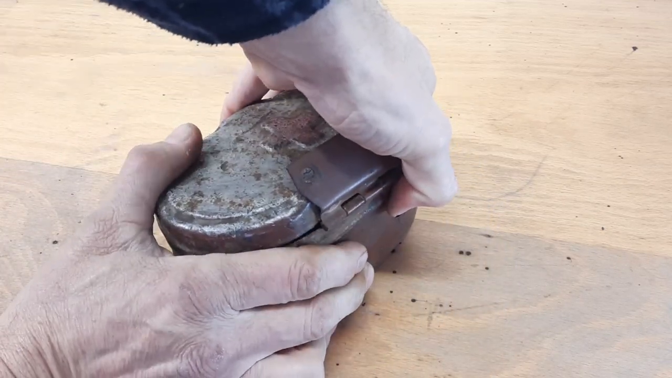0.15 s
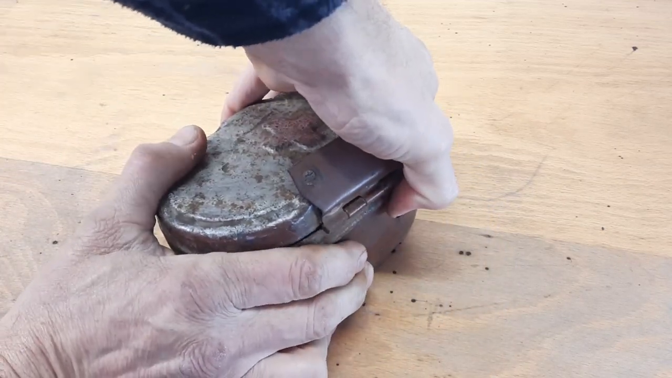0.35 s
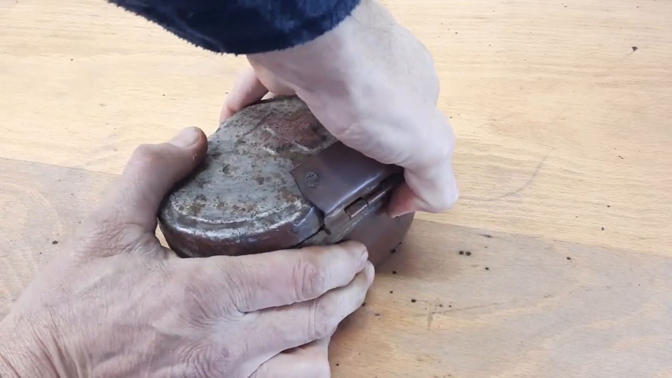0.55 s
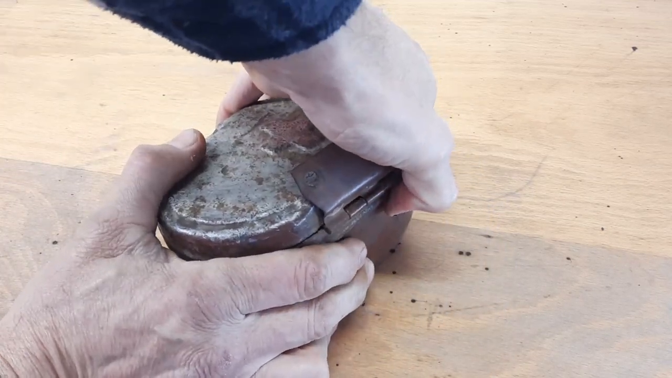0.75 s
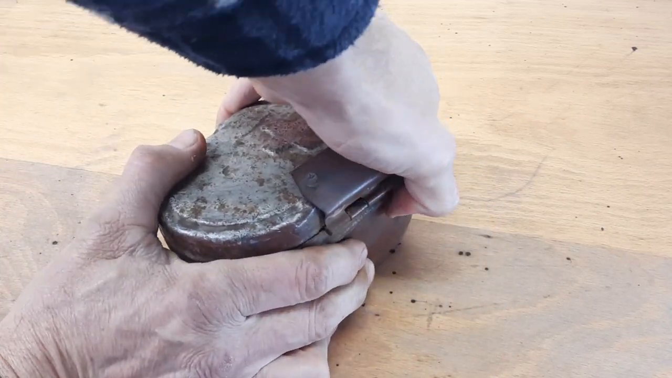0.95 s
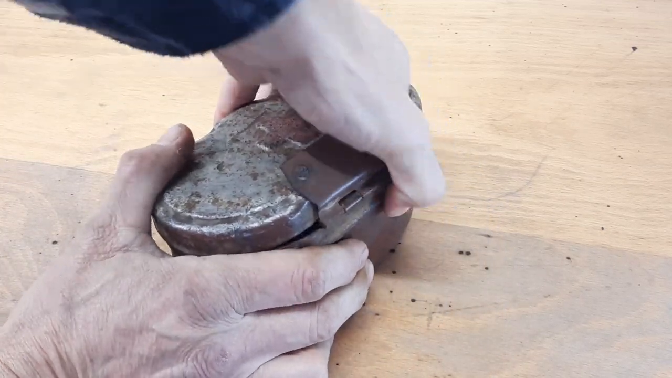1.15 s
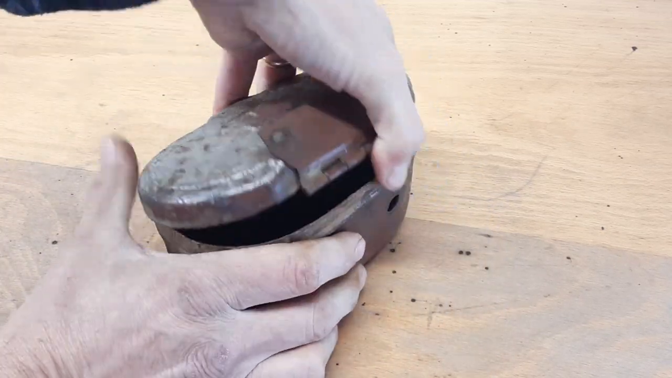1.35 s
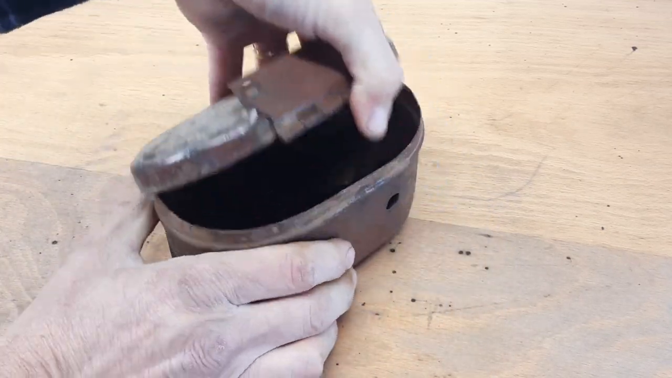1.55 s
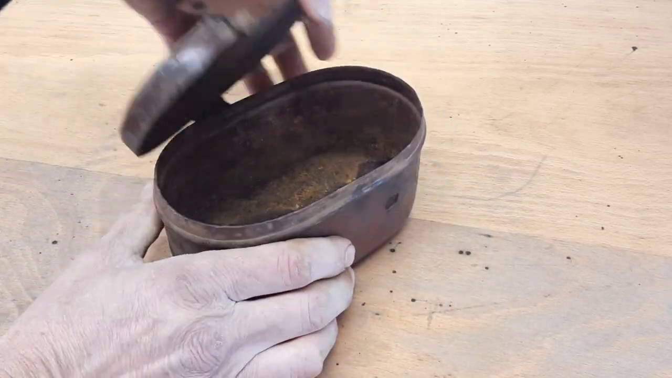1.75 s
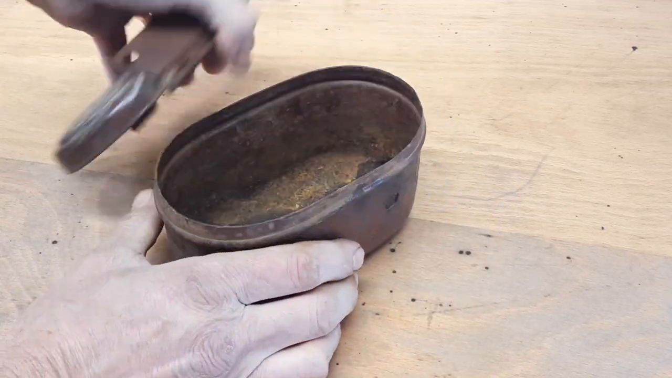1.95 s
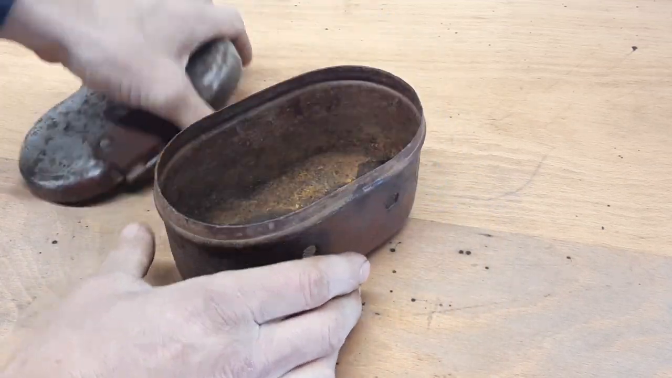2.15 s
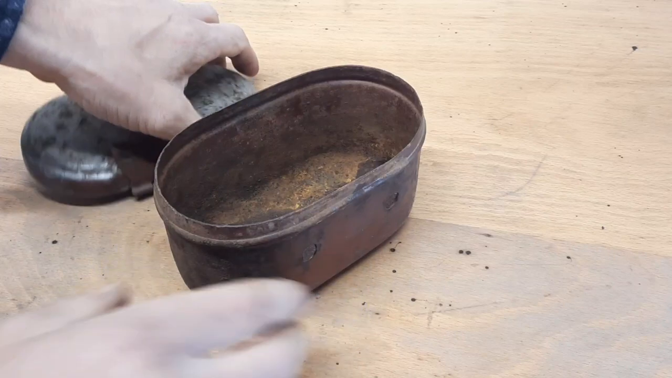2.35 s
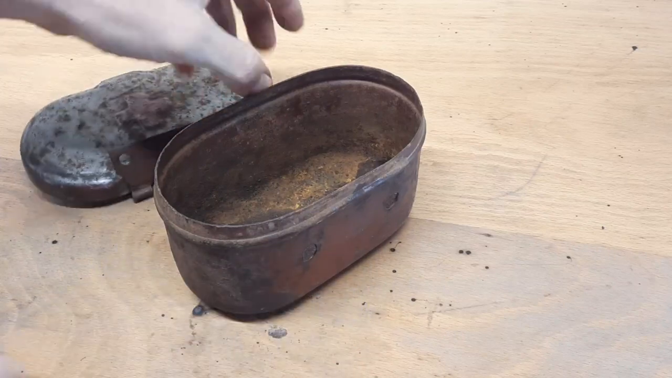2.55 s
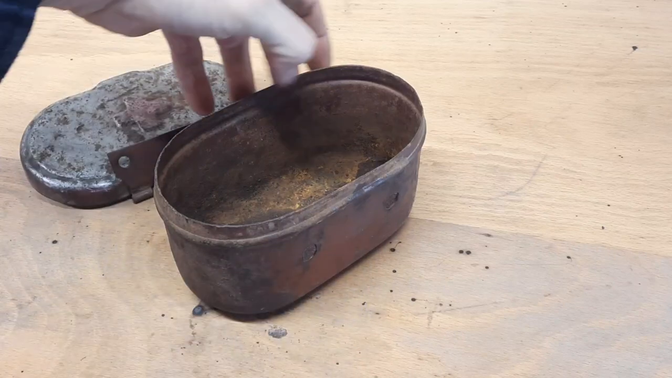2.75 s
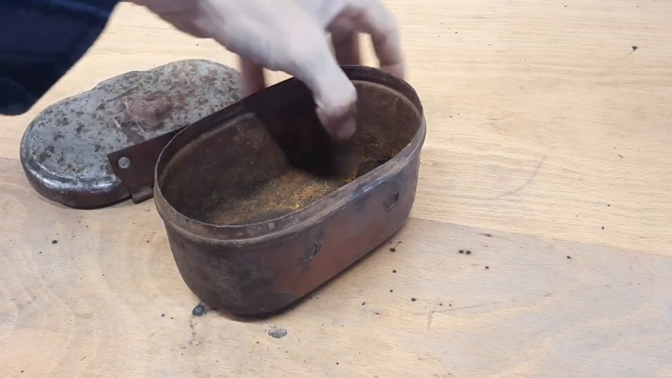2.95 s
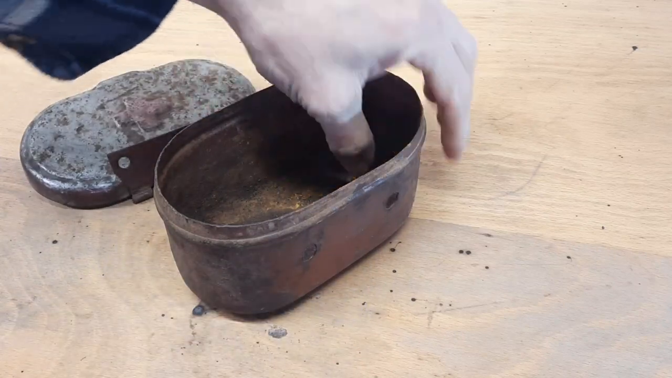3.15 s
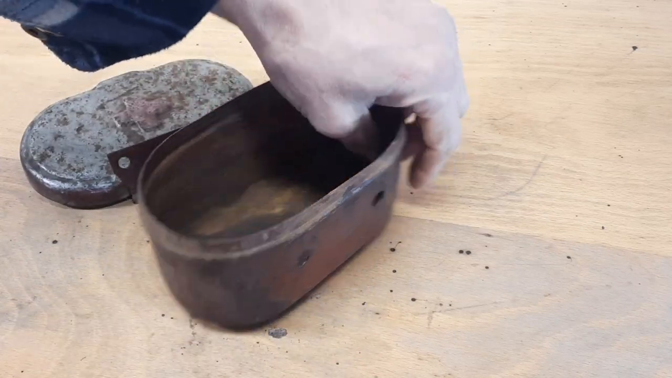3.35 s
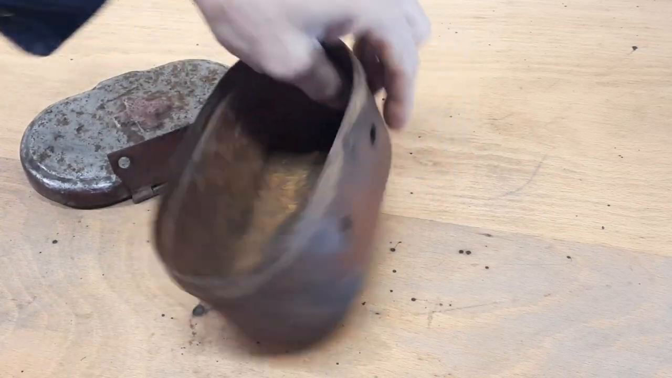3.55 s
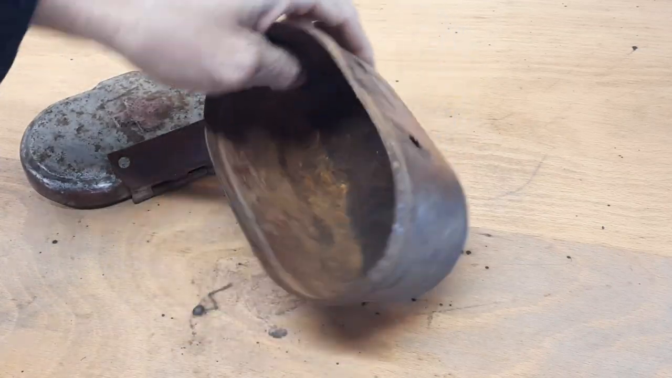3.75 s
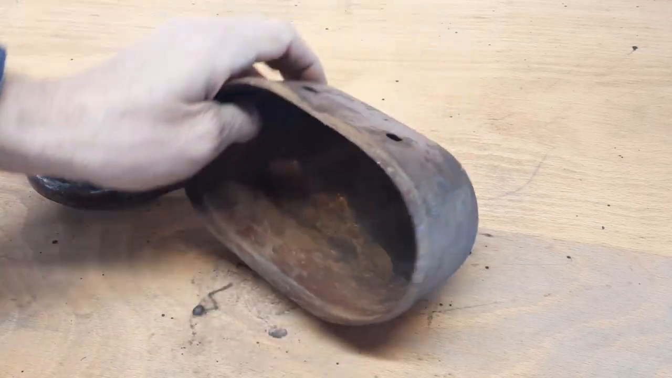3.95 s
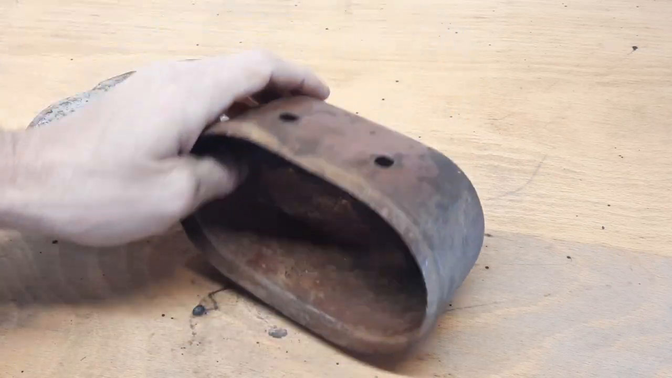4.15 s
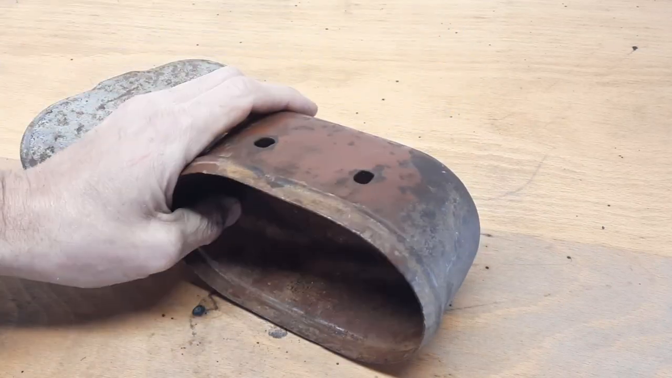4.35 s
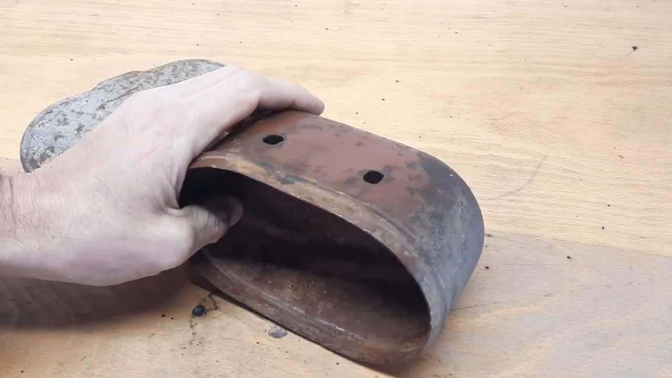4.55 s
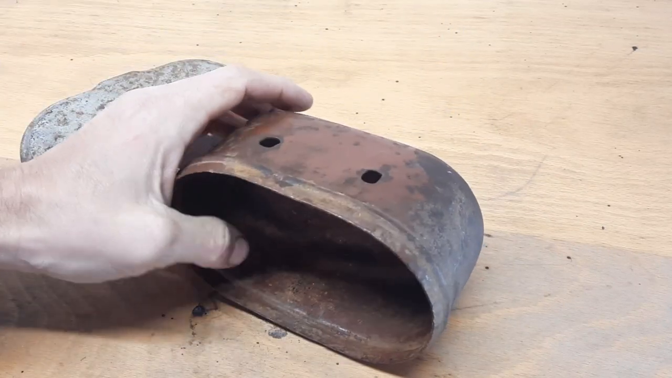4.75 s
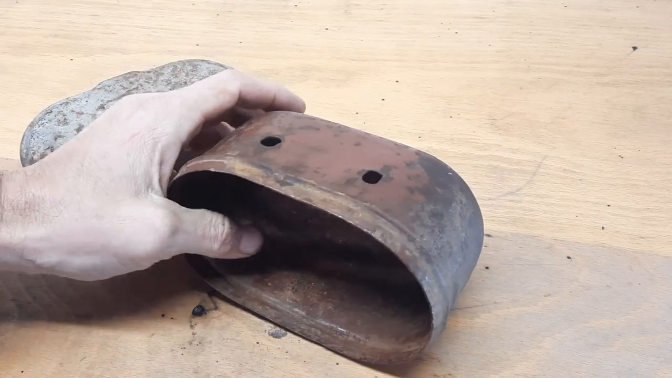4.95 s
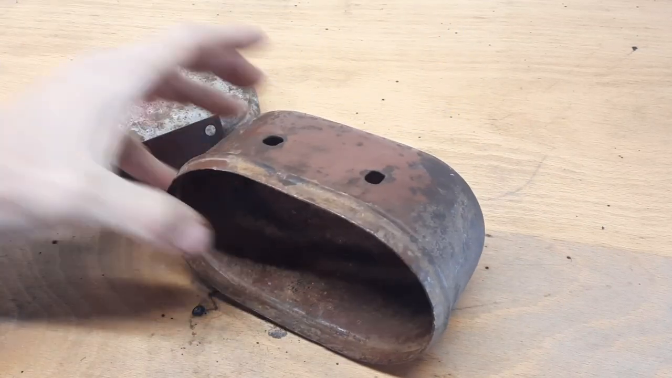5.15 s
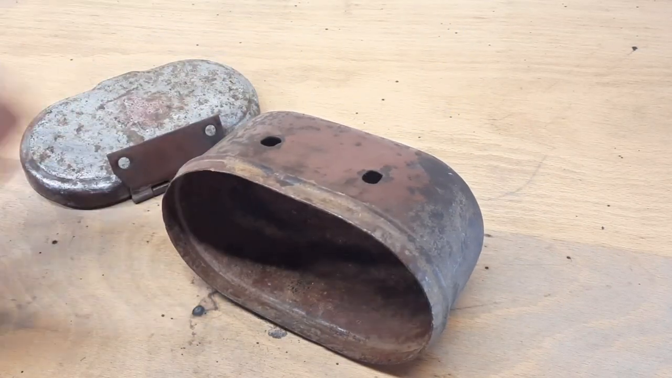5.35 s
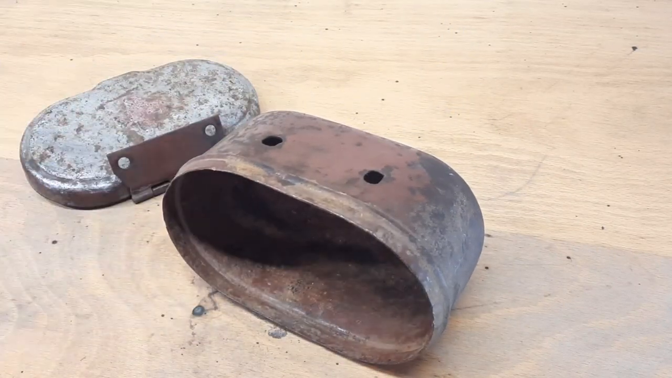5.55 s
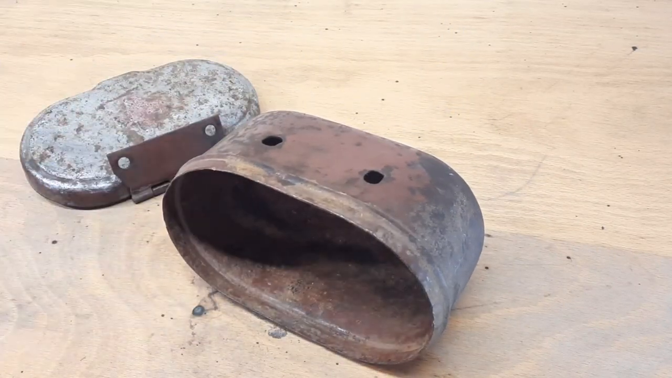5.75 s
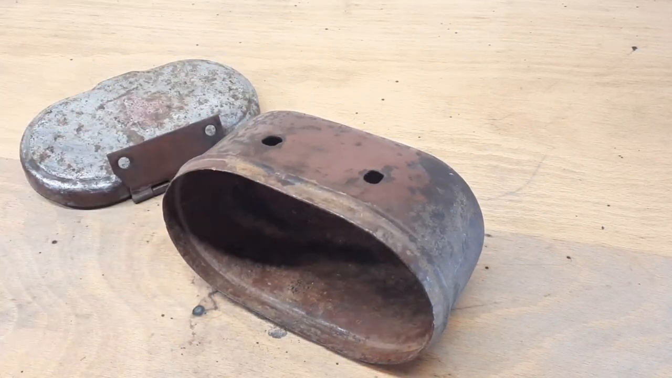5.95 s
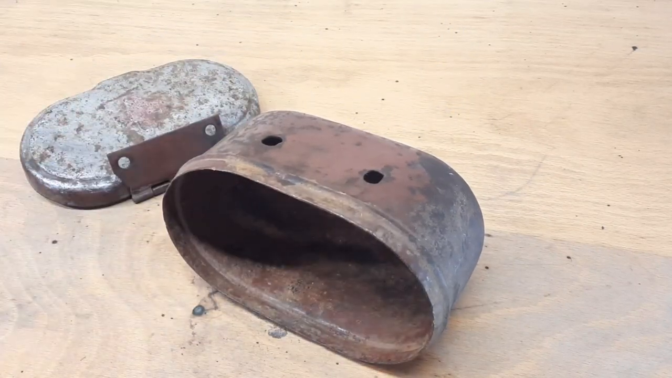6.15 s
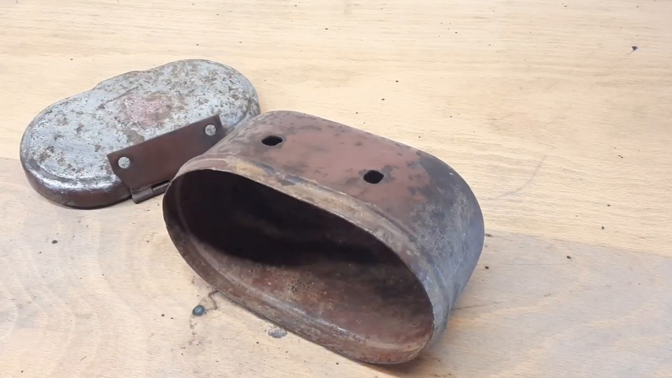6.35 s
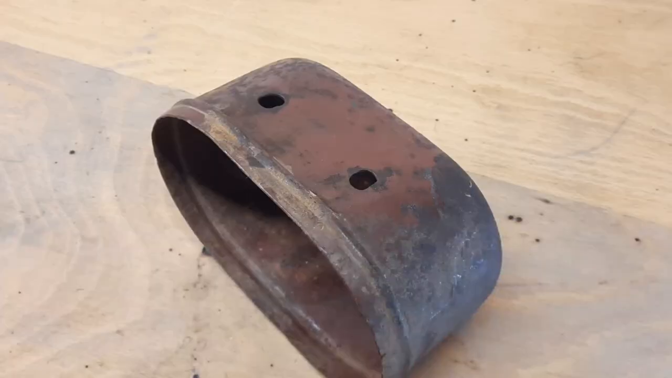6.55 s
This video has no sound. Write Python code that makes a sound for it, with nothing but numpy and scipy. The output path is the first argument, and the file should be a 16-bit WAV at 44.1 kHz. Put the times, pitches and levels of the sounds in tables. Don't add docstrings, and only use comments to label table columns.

```python
import sys
import numpy as np
from scipy import signal
from scipy.fft import rfft, irfft
from scipy.io import wavfile
from scipy.ndimage import uniform_filter1d

SR = 44100
rng = np.random.default_rng(int(sys.argv[2]) if len(sys.argv) > 2 else 0)


def boost(x):
    u = np.asarray(x, float) / 20
    return 10 ** u


def store_pcm(level_fs):
    pcm = np.round(np.clip(level_fs, -1, 1) * 32767).astype(np.int16)
    wavfile.write(sys.argv[1], SR, np.atleast_2d(pcm).T)


N = 291501

# f/Hz, level/dB
HUSH_SPECTRUM = [(590, -30), (1000, -5), (1340, -1), (2470, -4), (3460, -8), (16000, -13)]
HOUSE_SPECTRUM = [(12, -37), (20, 9), (66, 0), (208, -24), (270, -18.5), (400, -18.5), (770, -26),
                  (1000, -28.5), (1300, -57.5), (2200, -120)]
HUSH_DB, HOUSE_DB = -83, -64.5
ROOM_T60_S, ROOM_DB = 0.22, -14.5

# t/s, level/dB
BENCH_LOAD = [(0.0, -92), (1.0, -61.5), (1.12, -48), (1.19, -40.5), (1.27, -52.5), (1.33, -42.5),
              (1.54, -58.5), (1.67, -47), (2.0, -76.5), (2.34, -46.5), (2.75, -40), (3.05, -49),
              (3.12, -92), (3.4, -48.5), (3.62, -46), (3.95, -74), (4.14, -45), (4.46, -42.5),
              (4.62, -58.5), (5.75, -59.5), (6.0, -74.5)]
FRAME_HZ, SWAY_HZ, SWAY_DB = 60, 88, -2
BOARD_PER_LOAD, BOARD_DB = 2.06, 3

# f/Hz, level/dB, t60/s
BENCH_MODES = [(68.44, -4, 0.15), (148.7, 2, 0.093), (225.7, -7, 0.36), (302.1, -12, 0.05),
               (362.3, -12.5, 0.29)]
PADDED_BENCH_MODES = [(161, -2, 0.17), (237, 0, 0.16), (300, -10, 0.22), (377, -21, 0.3)]
HOLLOW_MODES = [(70.7, -5, 0.45), (150.3, -5, 0.27), (298.1, 5.5, 0.17)]

# f/Hz, level/dB, t60/s
SHUT_TIN_MODES = [(759, -5, 0.24), (1082, -5, 0.17), (1219, -10, 0.14), (1365, -9, 0.13), (1518, -7, 0.15),
                  (1663, -1, 0.12), (2175, -10, 0.12), (2342, -15, 0.14), (2998, 0, 0.17), (3435, -9, 0.17),
                  (3661, -13, 0.12), (4180, -12, 0.1), (4430, -19, 0.12), (5389, -14, 0.11)]
LID_MODES = [(520, -8, 0.18), (772, -11, 0.22), (974, -15, 0.2), (1049, -2, 0.38), (1101, -10, 0.16),
             (1236, -6, 0.13), (1302, -3, 0.13), (1510, -13, 0.15), (2223, -10, 0.14), (2632, 0, 0.045),
             (1175, -9, 0.15), (3133, -6, 0.06), (1382, -9, 0.12), (4415, -19, 0.2)]
FREE_TIN_MODES = [(2482, -12, 0.5), (2837, -13, 0.45), (2998, -6, 0.34), (3435, -4, 0.36), (4086, -5, 0.3),
                  (4253, -9, 0.22), (4495, -7, 0.2), (5136, 0, 0.15), (5615, 0, 0.18), (6158, -2, 0.13),
                  (6309, -3, 0.14), (6374, 3, 0.25), (7434, -14, 0.21), (8576, -5, 0.15)]
FREE_WALL_MODES = [(1357, -7, 1.0), (1986, -7, 0.8)]
HELD_TIN_MODES = [(517, 4, 0.2), (560, -1, .15), (608, -8, .12), (878, 0, 0.3), (1000, -15, .1),
                  (1520, -18, 0.1), (2075, -18, 0.2), (2620, -22, 0.15), (3400, -26, 0.2)]
HELD_LID_MODES = [(550, -6, 0.15), (704, -9, 0.1), (917, -8, 0.13), (1400, -8, 0.08), (2220, -13, 0.2),
                  (2403, -20, 0.14), (2700, -24, 0.35), (3250, -29.5, 0.27), (4409, -33, 0.3),
                  (4845, -40, 0.3)]

# f/Hz, level/dB
WOOD_COLOUR = [(18, -53), (30, -24.5), (59, -9.5), (146, -4), (212, 0), (297, -4), (387, -9.5), (523, -6.5),
               (600, -1), (780, -44), (1320, -120)]
KNOCK_COLOUR = [(180, -38), (300, -10.5), (391, -10), (526, -3), (620, -9.5), (1280, -14.5), (1780, -19),
                (2690, -17.5), (3280, -28.5), (7250, -26), (15500, -68.5)]
SHUT_COLOUR = [(180, -39.5), (300, -15.5), (610, -14.5), (1640, -14.5), (1840, -13.5), (3020, -18.5),
               (3870, -19.5), (7500, -17), (15500, -49.5)]
GRIT_COLOUR = [(180, -42), (300, -1), (384, -20.5), (562, -10), (663, -17.5), (877, -16), (1240, -19),
               (2650, -15), (4490, -32), (7370, -25.5), (15500, -51.5)]
DRAG_COLOUR = [(180, -34), (300, -6), (600, -11.5), (1730, -19), (2930, -18.5), (4490, -26.5),
               (8420, -23.5), (12000, -35), (15500, -42.5)]
PUSH_COLOUR = [(180, -37.5), (300, 7), (453, -26.5), (517, -11.5), (663, -21), (877, -12.5), (1440, -22.5),
               (2650, -19), (4500, -33.5), (9000, -38.5), (11500, -57), (15500, -78)]
WOOD_HZ, EDGE_HZ = 420, 3500
EVEN_HZ = 90

# f/Hz, width/Hz, level/dB
FINGER_PEAKS = [(816, 90, -3), (1360, 410, -1), (2800, 45, -17), (5830, 80, -12), (6660, 35, -16.5)]
LATCH_PEAKS = [(1230, 910, -10.5), (2160, 82, -2), (2400, 42, -3)]
HINGE_PEAKS = [(1600, 150, -12.5), (2130, 50, 4), (2500, 90, 0.5), (3240, 69, -10), (3418, 83, -10)]
SLACK_LID_PEAKS = [(560, 50, 4), (1180, 50, -3.5), (1980, 76, 1), (2420, 80, -5.5), (3000, 90, -9.5),
                   (3502, 33, -3.5)]
RIM_PEAKS = [(1420, 160, -11.5), (2050, 88, -15), (2190, 69, 3.5), (2900, 55, -17.5), (3780, 31, -13)]
LID_PEAKS = [(846, 35, -12), (1040, 2.6, -0.5), (1150, 22, -5.5), (2079, 65, -13), (2900, 69, -23),
             (3150, 61, -20.5), (5210, 36, -40.5)]
BASE_PEAKS = [(828, 15, 1), (1334, 32, -5), (1985, 41, -3.5), (2960, 68, -3.5), (4040, 53, -7),
              (5260, 110, -11), (6020, 59, -8.5), (7200, 180, -20.5)]
HEEL_PEAKS = [(523, 12, 4), (570, 20.6, 4), (865, 9.06, 6), (2300, 72, -12), (2700, 134, -11),
              (3960, 55, -15), (5400, 60, -15.5), (6800, 55, -12.5), (7450, 65, -13), (8080, 68.2, -17)]
SIDE_PEAKS = [(515.4, 17, 4), (886, 22.1, 7), (1569, 60, -4.5), (1930, 120, 0.5), (2692, 21.3, -8),
              (3256, 100, -7), (4000, 20, -13)]
PALM_PEAKS = [(810, 26, 1), (1360, 120, 1), (2250, 25, -7), (2370, 27, -4), (2764, 13, -19),
              (2930, 110, -6), (6300, 200, -9), (7430, 200, -11)]
SPOT_S, SPOT_SHIFT = 0.035, 0.0047
EDGE_PER_PRESSURE = 0.8

# t/s, level/dB
FINGERS_STROKE = [(0.0, -105), (0.228, -80), (0.274, -104), (0.314, -73), (0.448, -102), (0.528, -83),
                  (0.704, -77), (0.732, -101), (1.0, -109)]
PRY_STROKE = [
    (1.0, -99.5),
    (1.156, -54.5),
    (1.262, -73),
    (1.335, -39.5),
    (1.4, -55.5),
]
SQUEAK_STROKE = [
    (1.4, -45),
    (1.43, -43),
    (1.455, -56.5),
]
GROAN_STROKE = [
    (1.44, -51),
    (1.455, -48.5),
    (1.49, -47),
    (1.522, -53.5),
    (1.542, -66.5),
    (1.56, -68.5),
]
LIFT_STROKE = [
    (1.56, -50.5),
    (1.598, -39.5),
    (1.66, -45.5),
    (1.688, -61.5),
]
CARRY_STROKE = [
    (1.85, -84.5),
    (1.886, -91.5),
    (2.014, -82),
    (2.15, -69.5),
    (2.17, -66),
]
SETTLE_STROKE = [(2.17, -74.5), (2.242, -50.5), (2.572, -59), (2.622, -29.5), (2.698, -99), (2.78, -36),
                 (2.89, -62.5), (3.062, -99), (3.3, -97.5)]
DRAG_STROKE = [(3.23, -108.5), (3.3, -79), (3.372, -78.5), (3.382, -63.5), (3.402, -58), (3.42, -34.5),
               (3.45, -37), (3.48, -43), (3.525, -48), (3.54, -50)]
HEEL_STROKE = [(3.52, -69), (3.537, -38), (3.57, -35), (3.6, -30.5), (3.63, -32), (3.67, -40), (3.7, -54),
               (3.74, -97), (3.87, -87)]
SWING_STROKE = [(3.73, -91.5), (3.775, -72.5), (3.83, -86.5), (3.89, -79.5), (3.93, -68.5), (3.965, -54.5),
                (4.03, -61), (4.1, -56), (4.14, -85)]
PUSH_STROKE = [(3.87, -79), (4.102, -46), (4.134, -53), (4.284, -44.5), (4.36, -32.5), (4.392, -38.5),
               (4.46, -34), (4.5, -55), (4.56, -85.5)]
LET_GO_STROKE = [(4.56, -74.5), (4.696, -65.5), (4.734, -74.5), (4.788, -72), (4.874, -82), (4.978, -71.5),
                 (5.136, -75), (5.206, -90.5), (5.3, -97)]

# t/s, metal level/dB, thump level/dB, bright edge level/dB, struck spot f/Hz
PRISE_CONTACTS = [(1.078, -41, -52, -77, 1150), (1.14, -30, -18.5, -70, 870), (1.175, -31, -25, -62, 1170),
                  (1.2534, -43, -36, -68, 2400), (1.288, -34.5, -31, -66, 2400),
                  (1.311, -26, -26.5, -52, 880), (1.402, -24, -38, -37, 2800),
                  (1.449, -25, -42, -41.5, 2100), (1.514, -44.5, -37, -44.5, 2500),
                  (1.568, -39, -43, -40.5, 2240), (1.597, -47, -35.5, -32.5, 2150)]
RELEASE_CONTACTS = [
    (1.697, -12, -23, -13.5, 1600),
    (1.722, -41, -26.5, -40.5, 1106),
]
LAY_CONTACTS = [
    (2.18, -15, -16, -31, 1492),
    (2.199, -15, -14, -32.5, 544),
]
ROCK_CONTACTS = [(2.392, -18.5, -16, -40, 2700), (2.419, -25, -28, -30, 2930),
                 (2.4213, -1.5, -11.5, -33, 1900), (2.542, -7, -21.5, -37, 2700),
                 (2.545, -2, -15.5, -32, 2700), (2.561, -10, -31, -25.5, 1320),
                 (2.585, -40, -41, -25.5, 2600), (2.62, -4, -15.5, -33.5, 1620),
                 (2.697, -13.5, -17, -39.5, 2550), (2.7, -11.5, -47, -36, 1340),
                 (2.745, -13, -54, -39, 1270), (2.751, -27, -21.5, -54, 1050), (2.801, -18, -45, -56, 1040),
                 (2.829, -20.5, -24, -58, 630), (2.871, -25, -24, -77, 1030), (2.893, -29, -21, -75, 670),
                 (2.939, -34.5, -28, -94.5, 1062), (2.965, -53.5, -38, -74, 2700),
                 (2.997, -63, -38.5, -78, 2300), (3.022, -52.5, -41, -85, 1300)]
TOUCH_CONTACTS = [
    (2.7875, -31, -30, -27, 3130),
]
TIP_CONTACTS = [
    (3.381, -36, -47.5, -35, 1930),
    (3.406, -28.5, -32.5, -44, 2900),
    (3.42, -44, -36, -33, 2860),
    (3.439, -27.5, -32.5, -32.5, 2930),
    (3.535, -41.5, -44.5, -34.5, 2870),
    (3.641, -19, -27, -47, 2050),
    (3.652, -42, -49.5, -51.5, 1505),
    (3.676, -23, -39, -55.5, 2040),
    (3.686, -51.5, -43, -51, 2600),
]
NUDGE_CONTACTS = [(4.033, -36.5, -26.5, -51, 2090), (4.069, -31, -27, -34.5, 2760),
                  (4.115, -32, -31.5, -36, 2000), (4.126, -39, -55, -34.5, 3000),
                  (4.175, -28, -58, -32, 1900), (4.206, -24.5, -34, -28.5, 2020),
                  (4.214, -34, -30.5, -32.5, 2620), (4.235, -22, -46, -37, 2000),
                  (4.245, -20.5, -25, -31, 2700), (4.28, -29, -32.5, -34.5, 1940),
                  (4.384, -21, -25, -52, 2550), (4.436, -25, -48, -52, 2700),
                  (4.508, -33, -33.5, -57, 1510)]
LAND_CONTACTS = [
    (3.94, -12.5, -10.5, -52, 517),
    (3.952, -29, -17, -44, 527),
    (4.348, -20, -19.5, -50, 633),
]
# t/s, thump level/dB
ROLL_CONTACTS = [(4.811, -41.5), (4.902, -40.5), (4.968, -40.5), (5.144, -55), (5.278, -52), (5.409, -52.5),
                 (5.528, -55), (5.649, -53.5), (5.74, -54.5), (6.087, -67), (6.216, -64), (6.249, -62)]
ROLL_METAL_DB, ROLL_EDGE_DB, ROLL_HZ = -26, -46, 520


def unit(x):
    return x / np.sqrt(np.sum(x ** 2) + 1e-18)


def fade(t60, seconds):
    return np.exp(-np.log(1000) * np.arange(int(seconds * SR)) / SR / max(t60, .002))


def butter(x, hz, kind, order=3):
    return signal.sosfilt(signal.butter(order, hz, kind, fs=SR, output="sos"), x)


def gains(spectrum, size):
    hz, db = np.transpose(spectrum)
    bins = np.fft.rfftfreq(size, 1 / SR)
    return boost(np.interp(np.log(bins + 1), np.log(hz), db))


def coloured(spectrum, size):
    return irfft(rfft(rng.standard_normal(size)) * gains(spectrum, size), size)


def curve(table, after_db=-160):
    s, db = np.transpose(table)
    return np.interp(np.arange(N) / SR, s, db, -160, after_db)


def steady(spectrum, db):
    return unit(coloured(spectrum, N)) * np.sqrt(N) * boost(db)


def room(x):
    tail = rfft(rng.standard_normal(SR // 2) * fade(ROOM_T60_S, .5))
    tail = irfft(tail / np.sqrt(uniform_filter1d(np.abs(tail) ** 2, size=12)))
    tail = signal.lfilter([1], [1, -.6], tail * fade(1.5, .5))
    tail[:int(.004 * SR)] = 0
    return x + boost(ROOM_DB) * signal.fftconvolve(x, unit(tail))[:N]


def response(modes, colour, crowd_db, crowd_t60, longest_s=1.1):
    t = np.arange(SR) / SR
    clear = np.zeros(SR)
    for hz, db, t60 in modes:
        t60 = min(t60, longest_s * (1000 / hz) ** .5)
        clear += boost(db) * np.sin(2 * np.pi * hz * t) * fade(t60, 1)
    crowd = rfft(coloured(colour, SR) * fade(crowd_t60, 1))
    clumps = np.sqrt(uniform_filter1d(np.abs(crowd) ** 2, EVEN_HZ) + 1e-18)
    crowd = irfft(crowd * gains(colour, SR) / clumps)
    return unit(clear) + boost(crowd_db) * unit(crowd * (t < .5))


def damped(peaks):
    return [(hz, db + 20 * np.log10(width), np.log(1000) / np.pi / width) for hz, width, db in peaks]


def registers(body):
    return unit(butter(body, [WOOD_HZ, EDGE_HZ], "band")), unit(butter(body, EDGE_HZ, "high"))


def grit(size, spread_db):
    strength_db = spread_db * np.minimum(rng.exponential(size=size), 4)
    x = rng.standard_normal(size) * boost(strength_db)
    return x / np.sqrt(np.mean(x ** 2, axis=-1, keepdims=True))


def thump(modes, crowd_db, crowd_t60, longest_s):
    body = response(modes, WOOD_COLOUR, crowd_db, crowd_t60, longest_s)
    return unit(butter(body, [FRAME_HZ, WOOD_HZ], "band", order=2))


def rumble(strokes, bench):
    wood = coloured(WOOD_COLOUR, SR // 2) * fade(0.077, .5)
    board = unit(butter(wood, [0.29 * SWAY_HZ, WOOD_HZ], "band"))
    board = unit(board + boost(5) * bench[:len(board)])
    frame = coloured(WOOD_COLOUR, SR // 2) * fade(.25, .5)
    sway = unit(butter(frame, [FRAME_HZ, SWAY_HZ], "band", order=2))
    frame_mode = np.sin(2 * np.pi * 73 * np.arange(SR // 2) / SR) * fade(0.3, .5)
    sway = unit(sway + unit(frame_mode))
    force = grit(N, 2.7)
    load_db = curve(BENCH_LOAD, BENCH_LOAD[-1][1])
    mutter = boost(BOARD_DB + load_db + (BOARD_PER_LOAD - 1) * (load_db + 46.0))
    for stroke, db in strokes:
        mutter = mutter + boost(curve(stroke) + db)
    board_sound = signal.fftconvolve(force * mutter, board)
    sway_sound = signal.fftconvolve(force * boost(load_db + SWAY_DB), sway)
    return (board_sound + sway_sound)[:N]


def rub(stroke, peaks, crowd_db, rough_db, slip_db=4.0, edge_db=-9, colour=GRIT_COLOUR, shift=SPOT_SHIFT, count=4):
    out = np.zeros(N + SR)
    start = int(stroke[0][0] * SR)
    span = slice(start, int(stroke[-1][0] * SR))
    slips = boost(slip_db * np.repeat(rng.standard_normal(N // 200 + 1), 200)[:N])
    pressure_db = curve(stroke)[span]
    force = grit(N, rough_db)[span] * slips[span]
    bright_db = edge_db + pressure_db + (EDGE_PER_PRESSURE - 1) * (pressure_db + 50.5)
    hold = int(SPOT_S * SR)
    spot = np.repeat(rng.integers(count, size=N // 500), hold)[:len(force)]
    for k, detune in enumerate(rng.standard_normal((count, len(peaks)))):
        moved = [(hz * (1 + shift * z), width, db) for (hz, width, db), z in zip(peaks, detune)]
        sheet = response(damped(moved), colour, crowd_db, .035)[:SR // 2]
        middle, edge = registers(sheet)
        share = np.maximum(uniform_filter1d(1. * (spot == k), hold), 0)
        here = force * np.sqrt(share)
        ring = signal.fftconvolve(here * boost(pressure_db), middle)
        ring = ring + signal.fftconvolve(here * boost(bright_db), edge)
        out[start:start + len(ring)] += ring
    return out[:N]


def rubbing():
    rubs = rub(FINGERS_STROKE, FINGER_PEAKS, 0, 1.1, edge_db=-14.5)
    rubs += rub(PRY_STROKE, LATCH_PEAKS, 2.3, 1.5, edge_db=-0.5)
    rubs += rub(SQUEAK_STROKE, HINGE_PEAKS, -1, 3.4, edge_db=-3.5, shift=.01)
    rubs += rub(GROAN_STROKE, SLACK_LID_PEAKS, 0, 1.8, edge_db=-3.5, shift=.01)
    rubs += rub(LIFT_STROKE, RIM_PEAKS, -4, 2.5, 2, edge_db=-1, shift=.004)
    rubs += rub(CARRY_STROKE, RIM_PEAKS, 7.4, 3.4, edge_db=-14.0)
    rubs += rub(SETTLE_STROKE, LID_PEAKS, 5.4, 0.93, edge_db=-11.0)
    rubs += rub(DRAG_STROKE, BASE_PEAKS, 1.3, 3.1, 1.2, edge_db=-5.5, colour=DRAG_COLOUR)
    rubs += rub(HEEL_STROKE, HEEL_PEAKS, 0.83, 2.1, 2, edge_db=-12, colour=DRAG_COLOUR)
    rubs += rub(SWING_STROKE, HEEL_PEAKS, 2, 1.3, 1.7, edge_db=-5.5, colour=DRAG_COLOUR, shift=.003)
    rubs += rub(PUSH_STROKE, SIDE_PEAKS, 5, 2.2, 2.5, edge_db=-13, colour=PUSH_COLOUR)
    rubs += rub(LET_GO_STROKE, PALM_PEAKS, 5, 0.83, edge_db=-14.0)
    return rubs


def knocks(events, tin, low, blow_db, crack_db, ms, snap_db=-3, spot_db=7.5, top_hz=12000):
    out = np.zeros(N + 2 * SR)
    middle, edge = registers(tin)
    edge = unit(edge) + boost(snap_db) * unit(edge * fade(0.025, 1))
    chatter = grit((len(events), SR // 10), 3.5)
    chatter[:, 0] = boost(blow_db)
    for (s, metal_db, thump_db, edge_db, hz), force in zip(events, chatter):
        force = butter(force * fade(6 * ms / 1000, .1), top_hz, "low", order=2)
        spot = middle + boost(spot_db) * signal.lfilter(*signal.iirpeak(hz, 2.2, SR), middle)
        spot = unit(spot) + boost(crack_db) * unit(spot * fade(0.022, 1))
        push = fade(.003, .1)
        start = int(s * SR)
        for drive, body, db in ((force, spot, metal_db), (push, low, thump_db), (force, edge, edge_db)):
            ring = signal.fftconvolve(drive, body)
            out[start:start + len(ring)] += boost(db) * ring / np.abs(ring).max()
    return out[:N]


def lid_knocks(bench, padded):
    shut = response(SHUT_TIN_MODES, SHUT_COLOUR, 10, 0.09, 0.3)
    hits = knocks(PRISE_CONTACTS, shut, bench, 21, 4.2, ms=5.0, spot_db=18.5)
    sprung = response(SHUT_TIN_MODES, SHUT_COLOUR, 1, 0.12, 0.35)
    hits += knocks(RELEASE_CONTACTS, sprung, padded, 26, -6, ms=4.2, spot_db=-4)
    held_lid = response(HELD_LID_MODES, KNOCK_COLOUR, -0.5, 0.14, 0.9)
    hits += knocks(LAY_CONTACTS, held_lid, padded, 24.64, -5.5, ms=10.0)
    lid = response(LID_MODES, KNOCK_COLOUR, 2.5, .13, 0.5)
    hits += knocks(ROCK_CONTACTS, lid, bench, 23, 3, ms=4.0, top_hz=10500, spot_db=6)
    return hits


def tin_knocks(bench, padded):
    hollow = thump(HOLLOW_MODES, 0, 0.088, 0.048)
    boom = thump(HOLLOW_MODES, -3.0, 0.17, 0.083)
    free_modes = FREE_TIN_MODES + [(hz, db - 1, t60) for hz, db, t60 in FREE_WALL_MODES]
    free = response(free_modes, KNOCK_COLOUR, -10, .15, 1.2)
    hits = knocks(TOUCH_CONTACTS, free, bench, 30, -16, ms=12.0)
    tipped = response(damped(SIDE_PEAKS), DRAG_COLOUR, 17.0, 0.12)
    hits += knocks(TIP_CONTACTS, tipped, hollow, 20, 0, ms=4.16, snap_db=-9)
    pushed = response(damped(SIDE_PEAKS), PUSH_COLOUR, 21.6, 0.13)
    hits += knocks(NUDGE_CONTACTS, pushed, hollow, 12.2, 0, ms=3.4, snap_db=-2.5, top_hz=8600)
    held = response(HELD_TIN_MODES, KNOCK_COLOUR, -2, 0.15, 0.43)
    hits += knocks(LAND_CONTACTS, held, boom, 3.6, 1.2, ms=14.0)
    roll = [(s, db + ROLL_METAL_DB, db, db + ROLL_EDGE_DB, ROLL_HZ) for s, db in ROLL_CONTACTS]
    hits += knocks(roll, held, unit(bench + padded), 4.6, 0, ms=110.0)
    return hits


def scene():
    bench = thump(BENCH_MODES, -3.5, 0.099, 0.12)
    padded = thump(PADDED_BENCH_MODES, -8.5, 0.18, 0.38)
    wood = rumble([(FINGERS_STROKE, 3), (PRY_STROKE, -3), (SQUEAK_STROKE, -4), (GROAN_STROKE, -4),
                   (LIFT_STROKE, 3), (DRAG_STROKE, -3), (HEEL_STROKE, -3), (PUSH_STROKE, -6),
                   (LET_GO_STROKE, -9)], bench)
    hits = lid_knocks(bench, padded) + tin_knocks(bench, padded)
    near = butter(wood + rubbing() + hits, 13000, "low", order=2)
    background = steady(HUSH_SPECTRUM, HUSH_DB) + steady(HOUSE_SPECTRUM, HOUSE_DB)
    return (room(near) + background)[None]


def band_limit(x):
    return signal.sosfilt(signal.butter(12, 16300, fs=SR, output="sos"), x)


def record(dry):
    x = butter(dry, 53, "high", order=2)
    x = signal.sosfilt(signal.ellip(8, .2, 70, 15700, fs=SR, output="sos"), x)
    return band_limit(x)


dry = scene()
out = record(dry)
store_pcm(out)
```